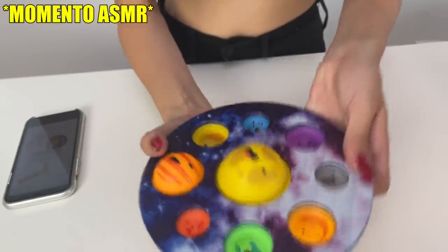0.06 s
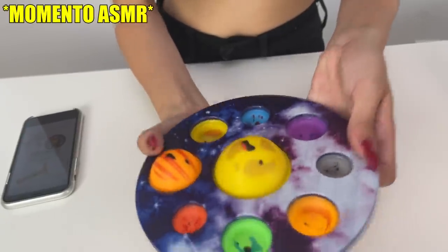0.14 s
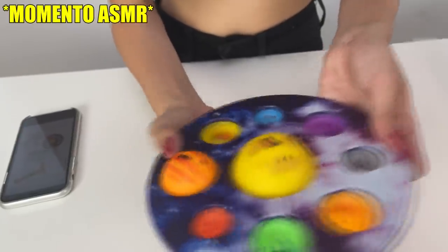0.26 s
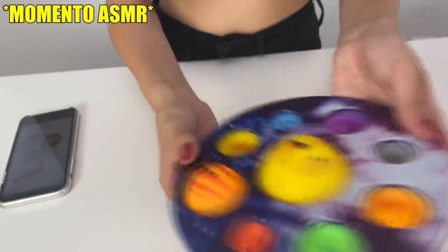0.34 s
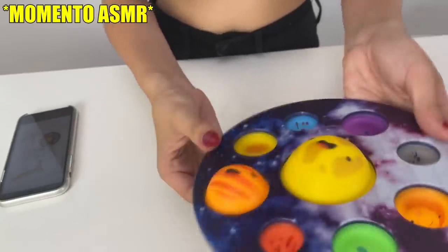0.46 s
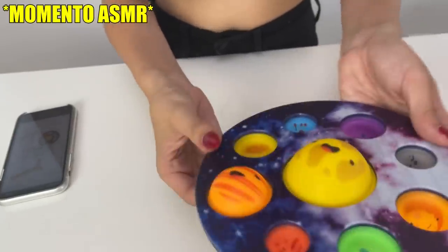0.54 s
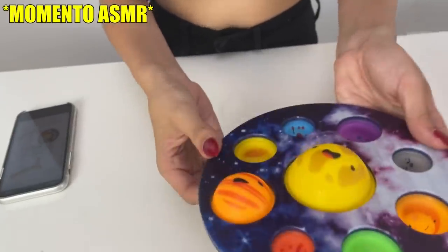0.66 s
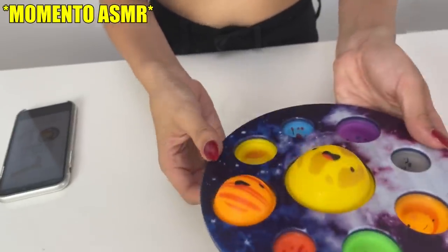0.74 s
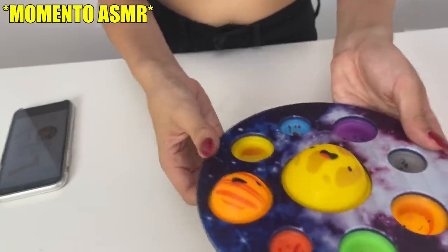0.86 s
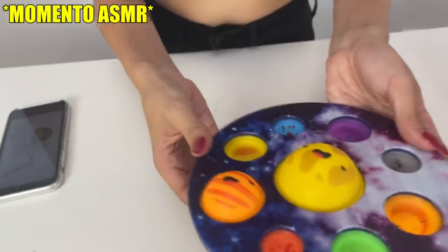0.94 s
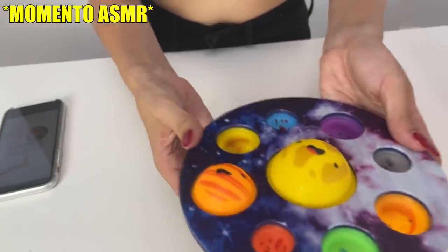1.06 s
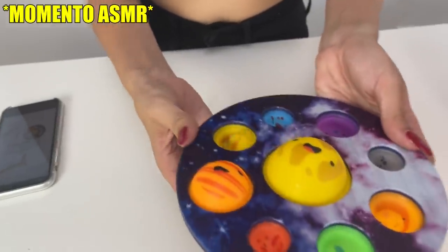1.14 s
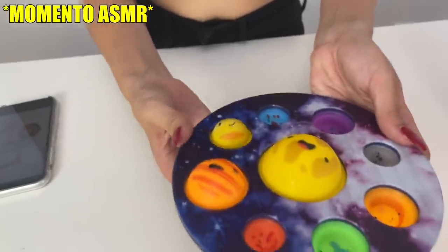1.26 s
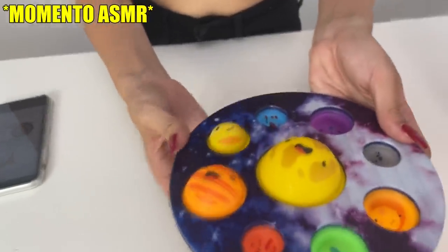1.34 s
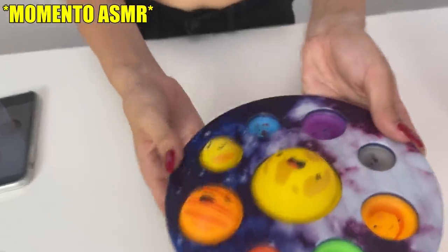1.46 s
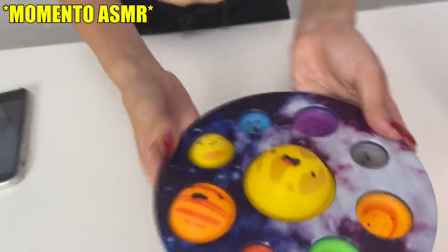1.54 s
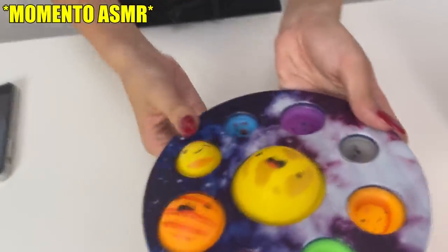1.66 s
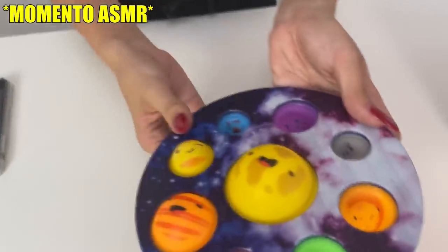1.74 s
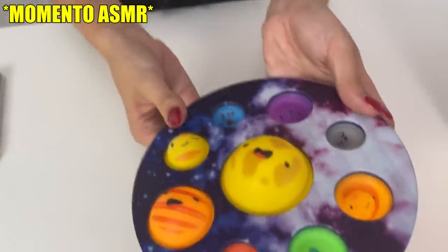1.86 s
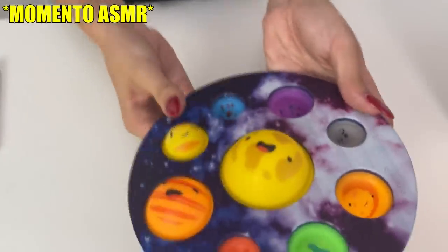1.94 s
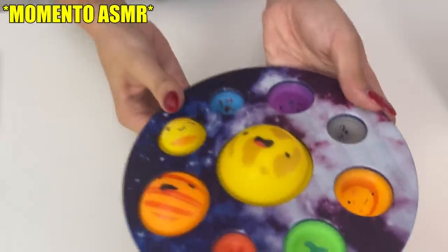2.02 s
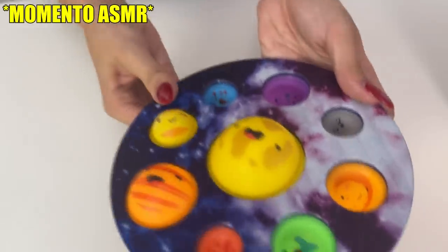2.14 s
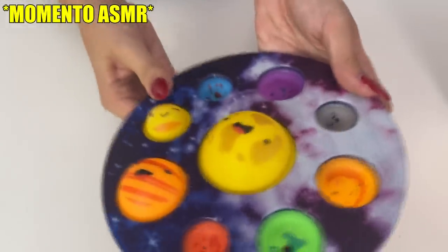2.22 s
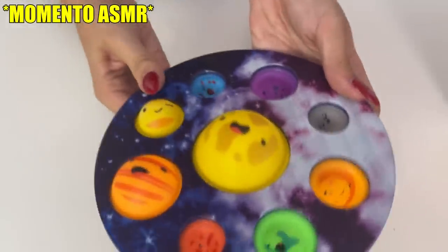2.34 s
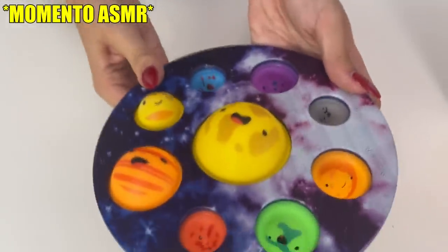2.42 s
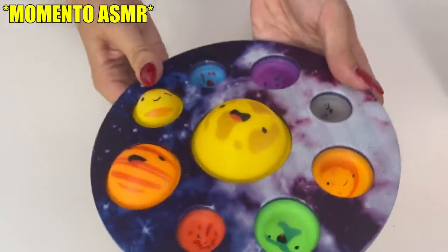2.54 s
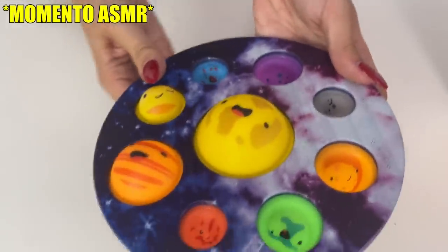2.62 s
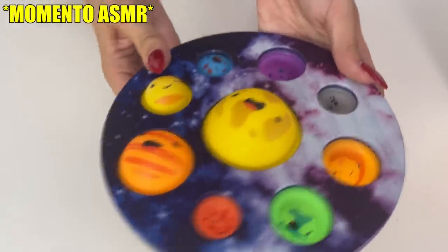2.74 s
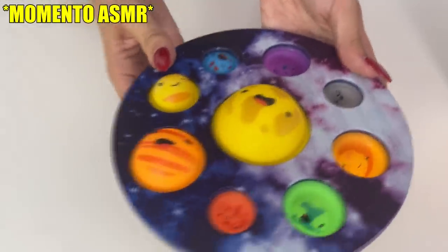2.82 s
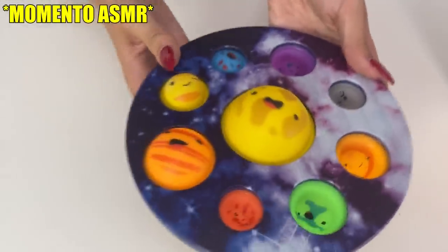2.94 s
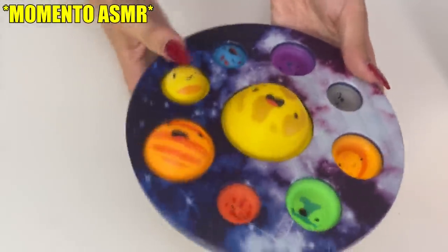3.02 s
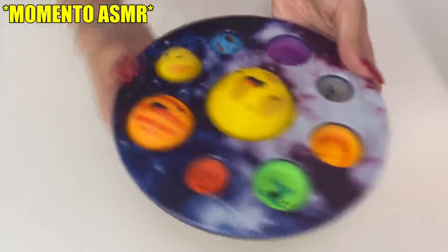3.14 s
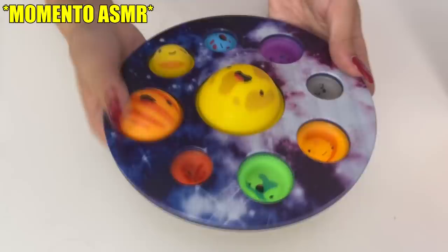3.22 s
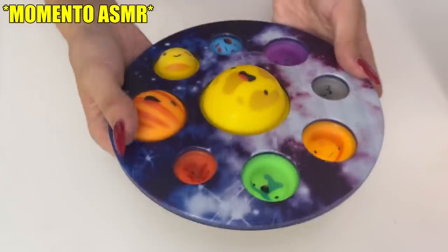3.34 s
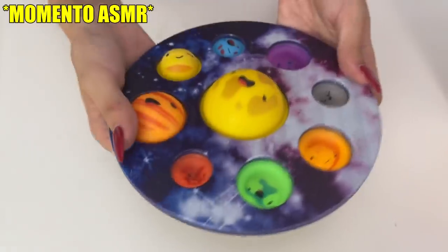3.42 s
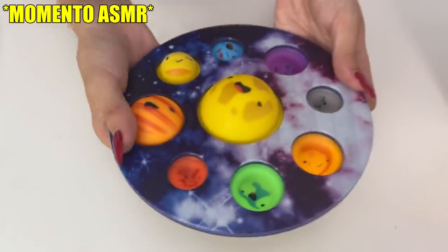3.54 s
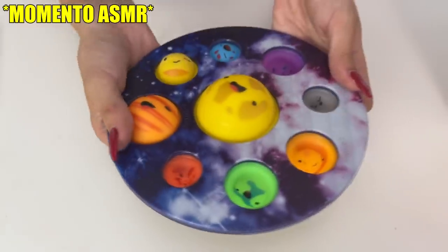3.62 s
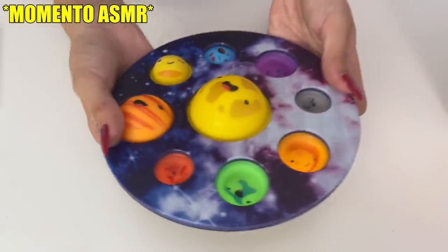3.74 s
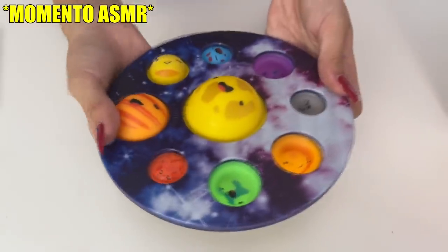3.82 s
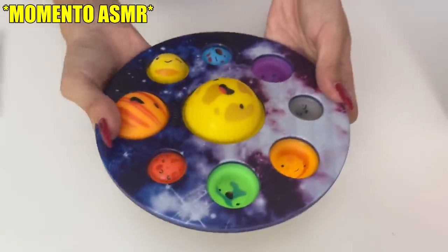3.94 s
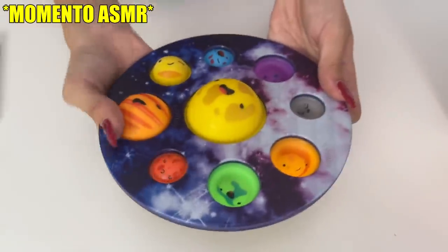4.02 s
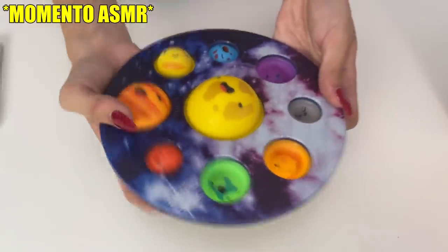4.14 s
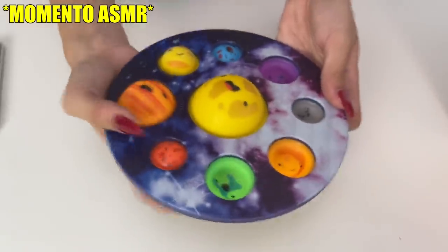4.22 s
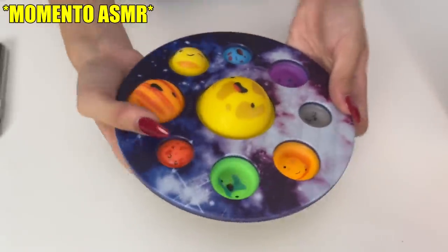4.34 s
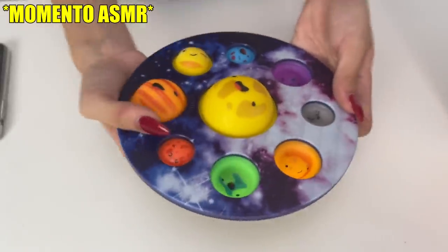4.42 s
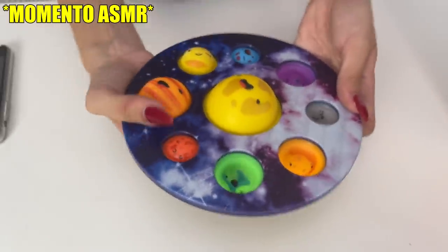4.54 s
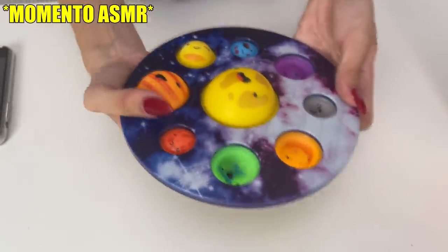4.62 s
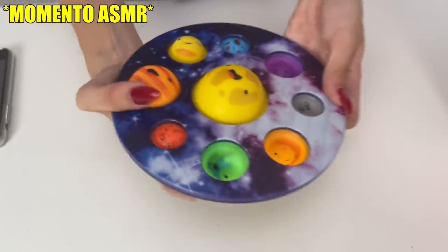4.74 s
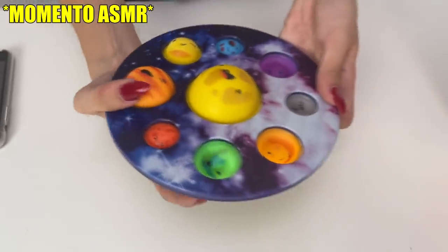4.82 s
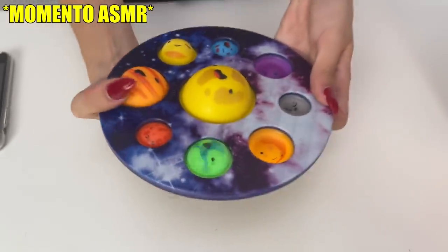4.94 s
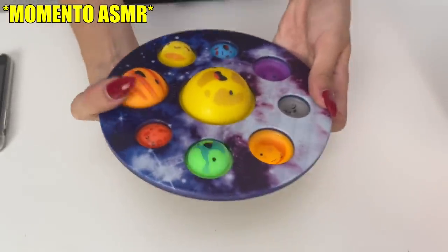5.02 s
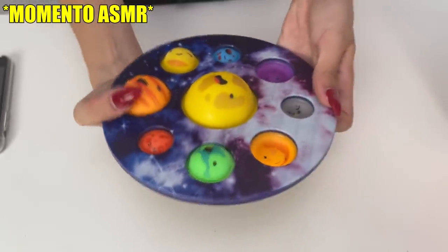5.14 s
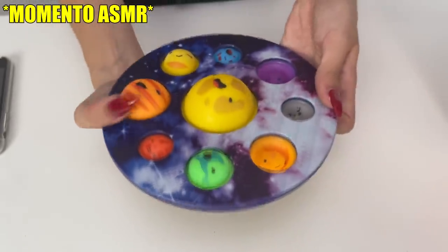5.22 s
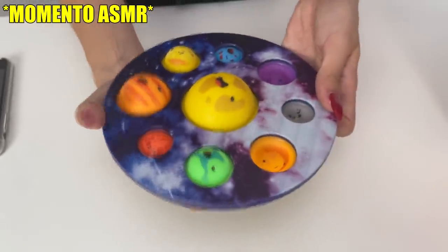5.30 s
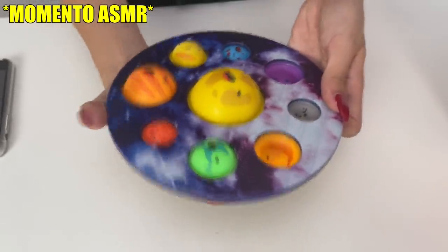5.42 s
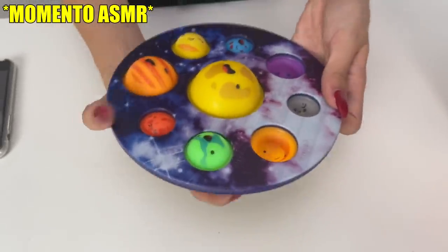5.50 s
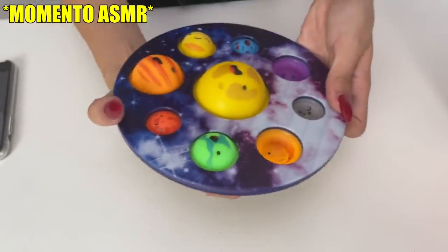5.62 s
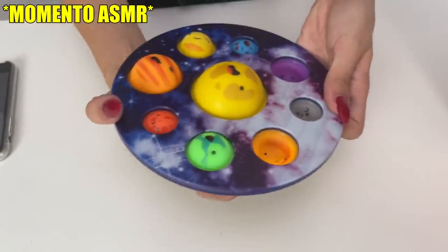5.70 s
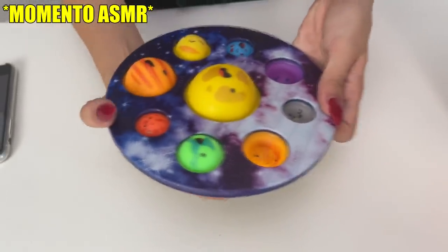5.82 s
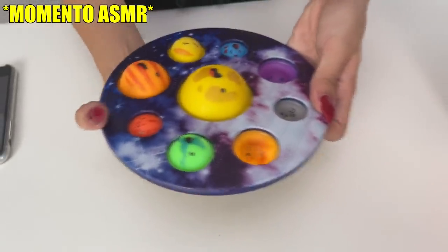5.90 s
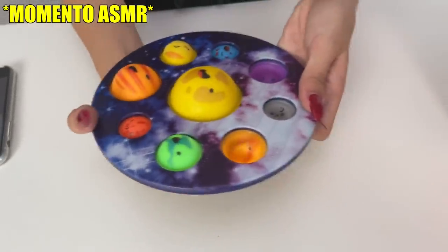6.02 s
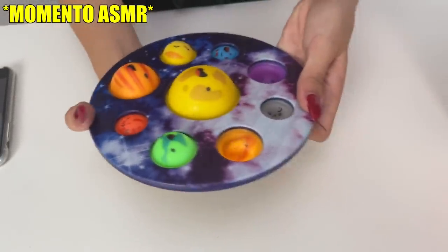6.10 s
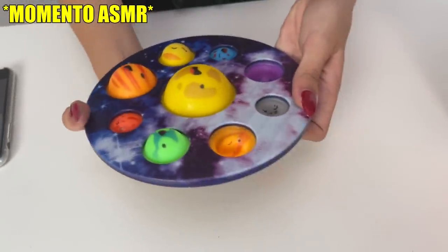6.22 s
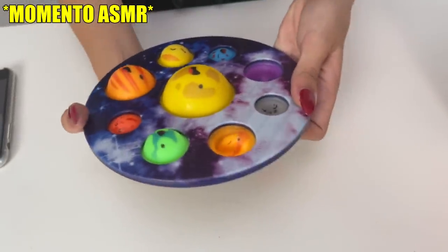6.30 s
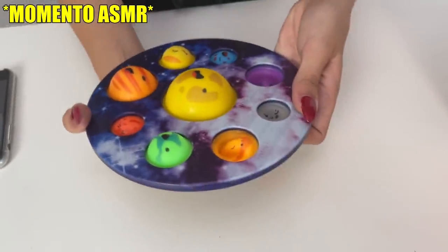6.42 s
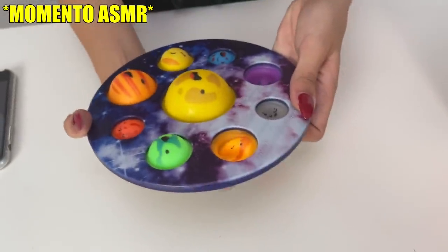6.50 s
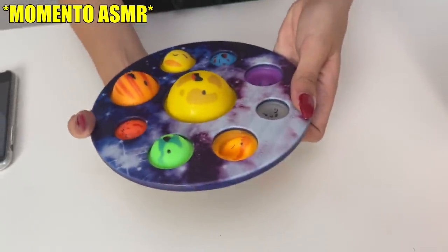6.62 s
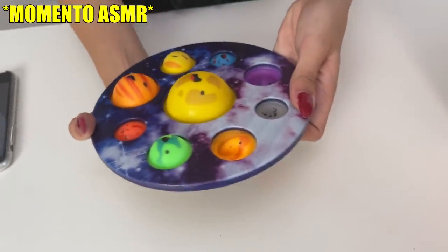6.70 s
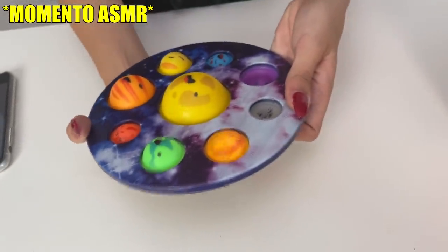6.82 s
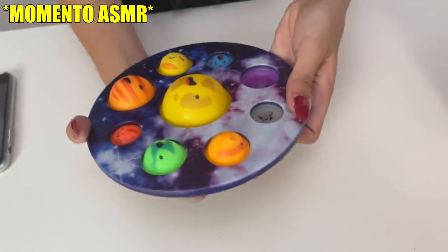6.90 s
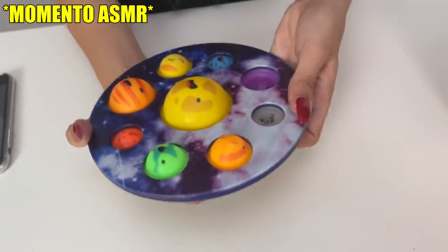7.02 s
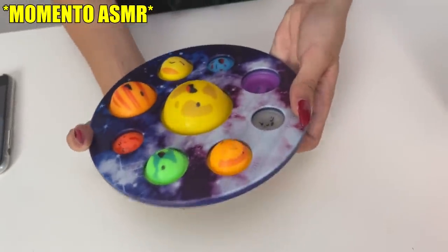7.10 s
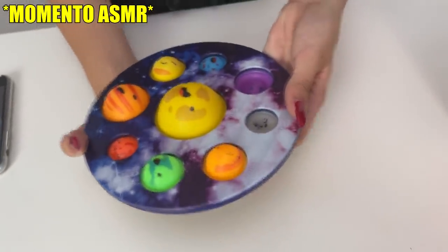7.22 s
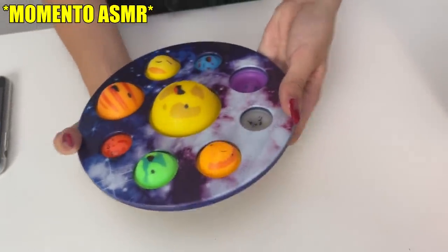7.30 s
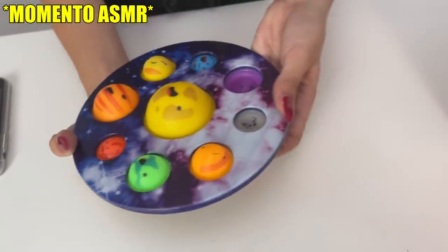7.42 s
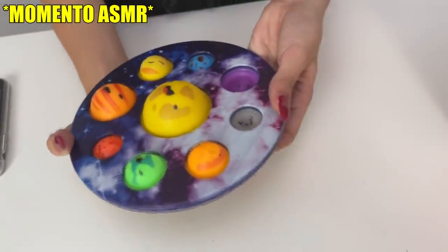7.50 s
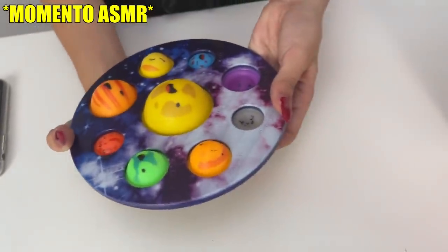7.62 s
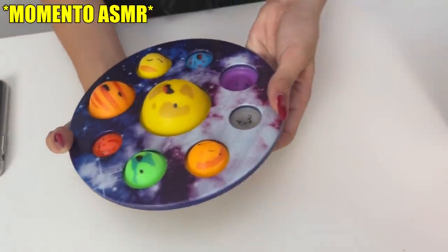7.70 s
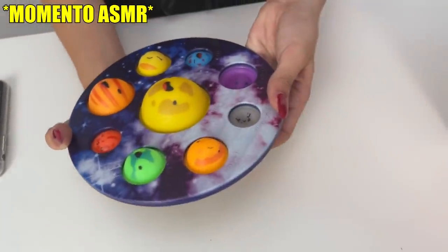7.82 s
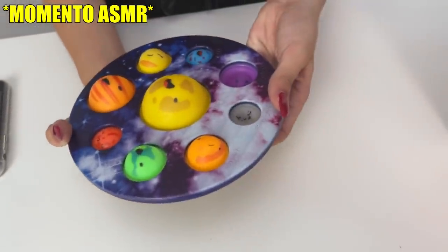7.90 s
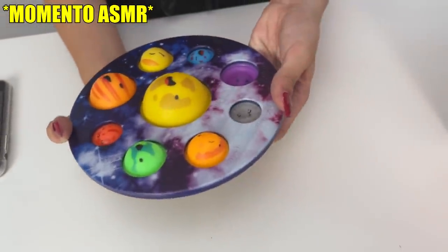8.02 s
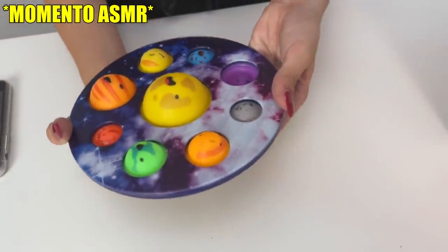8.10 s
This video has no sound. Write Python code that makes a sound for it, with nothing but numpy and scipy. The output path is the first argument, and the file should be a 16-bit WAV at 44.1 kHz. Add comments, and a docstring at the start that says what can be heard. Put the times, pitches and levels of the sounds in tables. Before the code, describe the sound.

Fingers push through a pop toy's rubber bubbles, making sharp, hollow, well-spaced pops with soft nail ticks between them.

```python
"""Popping silicone domes

Fingers push through the domes of a hand-held plastic disc, over a table in a bare, quiet room.
Each dome buckles with a crack, a rattle of the disc and a short hollow resonance. Between pops, nails
tick, skin slides and the hand bumps the disc. The walls reflect these sounds a moment later;
an appliance hums and something is knocked further off."""
import sys
import numpy as np
from scipy import signal
from scipy.fft import rfft, irfft
from scipy.io import wavfile
from scipy.ndimage import uniform_filter1d

SR = 44100
rng = np.random.default_rng(int(sys.argv[2]) if len(sys.argv) > 2 else 0)


def generate_wav(signal):
    """Clip the signal to [-1, 1] and save it as 16-bit WAV at the path in sys.argv[1]."""
    frames = np.transpose(np.atleast_2d(signal))
    scaled = np.clip(frames, -1, 1) * 32767
    pcm = np.round(scaled).astype(np.int16)
    wavfile.write(sys.argv[1], SR, pcm)


N = 359415
FREQ = np.maximum(np.arange(N // 2 + 1) * SR / N, 1)
BLOW_TIME = np.arange(2048) / SR
# Paths of a blow: one straight to the listener, three out to the walls.
DIRECT, WALL_HOLLOW, WALL_DISC, WALL_CRACK = range(4)
ROOM_GAP_S, BLUR_T60_S = .007, .005


def undb(db):
    """Decibels as an amplitude ratio."""
    return 10 ** (np.asarray(db) / 20)


def unit(x):
    """Normalisation to unit RMS."""
    return x / np.sqrt(np.mean(x ** 2))


def spectrum(table):
    """Interpolation of (Hz, value) rows over log frequency."""
    hz, value = np.transpose(table)
    return np.interp(np.log(FREQ), np.log(hz), value)


def band(x, lo_hz, hi_hz):
    """Band-pass filtering."""
    return signal.sosfilt(signal.butter(2, [lo_hz, hi_hz], "bandpass", fs=SR, output="sos"), x)


def ring(t, hz, t60):
    """Free vibration of one damped mode."""
    return np.sin(2 * np.pi * hz * t) * np.exp(-np.log(1000) * t / t60)


def pulse(peak_s):
    """Impact envelope: linear rise, exponential decay."""
    return BLOW_TIME / peak_s * np.exp(1 - BLOW_TIME / peak_s)


def add(out, start, sound):
    """Superposition from a start in seconds."""
    i = int(start * SR)
    out[i:i + len(sound)] += sound[:N - i]


# Each row: frequency in Hz, coherence between left and right from 0 to 1.
COHERENCE = [(60, 0.97), (130, 0.95), (290, 1), (1400, 0), (3100, 0.4), (6800, 0.09), (9000, 0.4)]
def diffuse(gain):
    """A diffuse field is alike at two points in the bass and largely unrelated higher up."""
    alike = spectrum(COHERENCE)
    mid, side = rfft(rng.standard_normal((2, N))) * gain
    channels = mid * np.sqrt(1 + alike) + np.array([[1], [-1]]) * side * np.sqrt(1 - alike)
    return irfft(channels, N) / np.sqrt(2)


# Each row: frequency in Hz, relative spectral density in dB.
ROOM_TONE = [(25, -20), (39, -14.5), (64, -5), (125, -9.5), (231, -22.5), (264, -22.5), (1090, -56.5),
             (3350, -45), (4620, -61.5), (11500, -54), (15000, -76)]
def background(hum_hz=57.2, hum_width_hz=4):
    """Steady room tone and hiss, with an appliance hum that wavers as narrow-band noise does."""
    hum = undb(-65.5) * unit(diffuse(1 / (1 + (2 * (FREQ - hum_hz) / hum_width_hz) ** 2)))
    tone = undb(-66.5) * unit(diffuse(undb(spectrum(ROOM_TONE))))
    hiss = undb(-90.5) * rng.standard_normal((2, N))
    return tone + hum + hiss


def rubber_crack(out, start, db):
    """A brief transient has a broad spectrum: a noise burst nearby, an impulse towards the walls."""
    envelope = pulse(peak_s=.0013)
    grit = band(rng.standard_normal(len(envelope)), 2000, 12000)
    impulse = band((BLOW_TIME == 0) * np.linalg.norm(envelope), 1000, 11000)
    add(out[DIRECT], start - .001, undb(db) * grit * envelope)
    add(out[WALL_CRACK], start - .0005, undb(db + 3.5) * impulse)


# Each row: mode frequency in Hz, relative level in dB, time to decay by 60 dB in seconds.
DISC_MODES = [(1467, -4, 0.054), (1950, -1, 0.0056), (2470, 8, 0.0038), (2980, 3.5, 0.0079),
              (3534, 2.5, 0.014), (4740, -0.5, 0.0049)]
def disc_rattle(out, start, db, spot_hz, grip_detune=.015):
    """Modal excitation: the place of a blow favours modes near one pitch; the grip detunes them."""
    modes = blurred = 0
    for k, (hz, mode_db, t60) in enumerate(DISC_MODES):
        octaves = abs(np.log2(hz / spot_hz))
        gripped_hz = hz * (1 + grip_detune * rng.standard_normal())
        modes += undb(mode_db - 20 * octaves) * ring(BLOW_TIME, gripped_hz, t60)
        # Over all directions, more modes take part and none is sharp.
        blurred += (-1) ** k * undb(-9 * octaves) * ring(BLOW_TIME, hz, BLUR_T60_S)
    jolts = rng.standard_normal(len(BLOW_TIME)) * pulse(peak_s=.0016) ** 2
    rattle = band(signal.fftconvolve(jolts, modes)[:len(jolts)], 1400, 5300)
    rattle *= undb(db) / np.abs(rattle).max()
    blurred *= undb(-1.5) * np.linalg.norm(rattle) / np.linalg.norm(blurred)
    add(out[DIRECT], start - .0005, rattle)
    add(out[WALL_DISC], start - .0005, blurred)


def blow(out, start, db, hollow_hz, disc_db, crack_db, spot_hz):
    """Cavity resonance: just after the crack and the rattle, the hollow rings for a few cycles."""
    rubber_crack(out, start, db + crack_db)
    disc_rattle(out, start, db + disc_db, spot_hz)
    hollow = ring(BLOW_TIME, hollow_hz, t60=.0068) * (1 - np.exp(-BLOW_TIME / .00045)) ** 2
    for path in (DIRECT, WALL_HOLLOW):
        add(out[path], start, undb(db) * hollow / np.abs(hollow).max())


# Each row: start in seconds, level in dB, hollow resonance in Hz, disc and crack levels in dB,
# favoured disc pitch in Hz, low ring in dB. Disc, crack and low ring are relative to the level.
DOME_POPS = [(0.047, -14, 950, 1, -19, 2285, -36), (0.071, -3, 957, -7, -16, 1994, -35.5),
             (1.365, -8.5, 880, -2, -19, 1950, -35.5), (2.798, -28, 1485, 7.5, -11, 2000, -40),
             (2.806, -9.5, 1408, -2, -16.5, 2190, -39.5), (3.94, -16.5, 643, 8, -2, 2000, -34.5),
             (5.059, -9.5, 797, -1.5, -17.5, 2030, -42), (6.951, -8.5, 802, -1, -19.5, 2186, -33)]
def dome_pops(bend_hz=470, low_hz=530, beat_hz=22):
    """Snap-through buckling: a dome bends the whole disc, and two close low modes ring on, beating."""
    out, t = np.zeros((4, N)), np.arange(SR // 2) / SR
    bend = ring(BLOW_TIME, bend_hz, t60=.01) * (1 - np.exp(-BLOW_TIME * bend_hz * 2))
    bend *= undb(-11.5) / np.abs(bend).max()
    low_ring = ring(t, low_hz, t60=.59) + ring(t, low_hz + beat_hz, t60=.59)
    low_ring *= 1 - np.exp(-t / .012)
    for start, db, *timbre, ring_db in DOME_POPS:
        blow(out, start, db, *timbre)
        add(out[DIRECT], start, undb(db + ring_db) * low_ring)
        add(out[DIRECT], start + .002, undb(db) * bend)
        add(out[WALL_HOLLOW], start + .002, undb(db - 7) * bend)
    return out


# Each row: start in seconds, level in dB.
HAND_BUMPS = [(0.05, -26), (0.072, -17), (0.821, -40), (3.75, -52.5), (3.805, -48.5), (3.943, -41),
              (4.838, -34.5)]
def hand_bumps(thud_hz=215):
    """Soft impact: the hand meets the disc with a dull, heavily damped thud."""
    out = np.zeros((4, N))
    thud = np.sin(2 * np.pi * thud_hz * BLOW_TIME) * pulse(peak_s=.0016)
    for start, db in HAND_BUMPS:
        add(out[DIRECT], start, undb(db) * thud)
        add(out[WALL_HOLLOW], start, undb(db - 5) * thud)
    return out


# Each row: band centre in Hz, level in dB, reverberation time in seconds.
ROOM_BANDS = [(154, -44.5, 0.66), (430, -44, 0.82), (940, -42.5, 0.77), (1800, -42.5, 0.71),
              (3530, -43.5, 0.77), (6840, -45, 0.63), (10300, -49, 0.92)]
def reverberation(*sources):
    """Wall reflections arrive after a gap, strong at first, then decay exponentially band by band."""
    t = np.arange(SR) / SR - ROOM_GAP_S
    centres = np.log([row[0] for row in ROOM_BANDS])
    noise, response = rfft(diffuse(0.8)), 0
    onset = np.clip(t * 150, 0, 1) * (1 + 1.7 * np.exp(-t / .019))
    for k, (_, db, t60) in enumerate(ROOM_BANDS):
        share = np.interp(np.log(FREQ), centres, np.arange(len(centres)) == k)
        # Each source radiates its own way, so each has its own echo pattern.
        echoes = irfft(noise * share, N)[:, :len(sources) * SR].reshape(2, len(sources), SR)
        response += undb(db) * onset * np.exp(-np.log(1000) * t / t60) * echoes
    return signal.fftconvolve(np.array(sources)[None], response, axes=2).sum(axis=1)[:, :N]


def swell(length):
    """Envelope of a stroke: a fast rise and a slower fall."""
    return np.sin(np.pi * np.linspace(0, 1, int(length * SR)) ** 0.5) ** 4.7


def wander(samples):
    """Slow random variation: a moving average of noise."""
    return unit(uniform_filter1d(rng.standard_normal(N), size=samples))


def skin_crackle(ticks_per_s=140, hollow_hz=800):
    """Adhesion: skin lets go of the rubber in random ticks, each exciting a hollow or a disc mode."""
    released = rng.random(N) < ticks_per_s / SR
    ticks = released * undb(10 + 4 * rng.exponential(size=N).clip(0, 3))
    pitches = [hollow_hz] + [row[0] for row in DISC_MODES[:-1]]
    excited = rng.integers(len(pitches), size=N)
    t = np.arange(512) / SR
    return sum(np.convolve(ticks * (excited == k), ring(t, hz, BLUR_T60_S))[:N]
               for k, hz in enumerate(pitches))


# Each row: start in seconds, length in seconds, rub level in dB, hiss level in dB.
SKIN_SLIDES = [(0.31, 0.35, -71, -74.5), (0.645, 0.43, -75.5, -93), (1.016, 0.39, -68, -69),
               (1.288, 0.28, -70, -75), (1.596, 0.23, -77, -87), (1.796, 0.37, -80, -70),
               (2.744, 0.065, -68.5, -85), (2.884, 0.32, -57, -84.5), (3.444, 0.12, -88.5, -61.5),
               (3.729, 0.41, -73.5, -75.5), (4.13, 0.24, -59.5, -67.5), (4.609, 0.63, -63, -75.5),
               (5.592, 0.46, -78.5, -71), (5.922, 0.39, -74, -101.5), (6.441, 0.24, -75.5, -75),
               (6.8, 0.32, -79, -71), (7.234, 0.18, -62.5, -78), (2.191, 0.42, -76.5, -85),
               (8.059, 0.24, -75.5, -101.5)]
def skin_slides():
    """Sliding friction: skin catches and slips on plastic and rubber, with a swish and a crackle."""
    rub, hiss = np.zeros((2, N))
    for start, length, rub_db, hiss_db in SKIN_SLIDES:
        add(rub, start, undb(rub_db) * swell(length))
        add(hiss, start, undb(hiss_db) * swell(length))
    rub += undb(-87 + 4 * wander(samples=5000))  # the hands never rest
    grip = undb(3 * wander(samples=300))
    low_noise = unit(band(rng.standard_normal(N), 500, 2300))
    high_noise = unit(band(rng.standard_normal(N), 2400, 11000))
    return rub * (grip * low_noise + skin_crackle()) + hiss * high_noise


# Each row: start in seconds, level in dB, hollow resonance in Hz, disc and crack in dB relative
# to that level, favoured disc pitch in Hz.
FINGER_TAPS = [(0.566, -48.5, 1200, -10, -41, 3000), (0.813, -42.5, 879, -16.5, -45, 1700),
               (1.171, -25, 490, -19, -32.5, 1470), (1.76, -36, 1398, -8, -37, 2900),
               (1.767, -36, 820, 5, -22, 1430), (2.051, -56, 1424, 7.5, -27, 2470),
               (2.249, -48, 1020, -3.5, -16, 1480), (2.342, -30.5, 1480, 0, -6.5, 2300),
               (2.554, -52.5, 874, -19, -40.5, 2080), (3.107, -42.5, 1400, 3.5, -4.5, 2340),
               (3.158, -57, 752, 7.5, -4, 1710), (3.291, -37.5, 773, 1.5, -23.5, 1450),
               (3.361, -25.5, 1330, -2.5, -0.5, 2750), (3.763, -52.5, 773, 5, -12.5, 1450),
               (3.782, -47.5, 790, 2, -5, 1480), (3.8, -40, 873, -7.5, -29.5, 1480),
               (4.257, -44.5, 1100, 1.5, -9.5, 3500), (4.428, -36.5, 940, 0, -15.5, 3860),
               (4.685, -37, 1020, -5.5, -16.5, 1800), (4.692, -40.5, 980, -4, -23, 1610),
               (4.739, -36, 990, -11.5, -15, 2560), (4.747, -41, 1060, 2, -9.5, 1900),
               (4.802, -42.5, 2190, 11, 2, 3700), (4.831, -37.5, 860, -7, -33.5, 1570),
               (4.861, -47.5, 926, 8.5, 8.5, 2960), (4.878, -55.5, 1430, 9.5, -1, 3300),
               (4.966, -50, 710, 2, -10.5, 1570), (5.012, -46, 790, 2.5, -5, 1980),
               (5.388, -29, 1438, -7, 0, 2840), (5.421, -40.5, 1500, 7.5, 3, 3530),
               (5.49, -42, 890, -3, -12, 1530), (5.51, -39, 1030, 4, -38, 3500),
               (6.148, -47.5, 1429, -13, -31, 3800), (6.171, -56, 1430, -1, -27.5, 3410),
               (6.232, -51.5, 1560, 1, -23, 3890), (6.491, -52, 1540, 13, -17, 2440),
               (6.828, -67, 1486, 14.5, -10.5, 2400), (6.855, -55.5, 1640, 13.5, -3, 2350),
               (7.175, -41.5, 630, 11.5, -4, 2770), (7.592, -41.5, 1040, -2, -37, 1624),
               (8.052, -56, 940, -1, -5, 1396)]
def finger_taps():
    """Impact excitation: nails and fingertips lightly sound the resonances of the disc."""
    out = np.zeros((4, N))
    for tap in FINGER_TAPS:
        blow(out, *tap)
    return out


# Each row: start in seconds, length in seconds, pitch in Hz, level in dB.
SKIN_SQUEAKS = [(4.202, 0.041, 3014, -49.5), (6.252, 0.23, 1500, -73.5)]
def skin_squeaks(q=5):
    """Friction of skin on rubber, concentrated in a narrow band."""
    out = np.zeros(N)
    for start, length, hz, db in SKIN_SQUEAKS:
        noise = band(rng.standard_normal(int(length * SR)), hz * (1 - .5 / q), hz * (1 + .5 / q))
        add(out, start, undb(db) * swell(length) * unit(noise))
    return out


# Each row: arrival in seconds, level in dB, pitch in Hz.
FAR_KNOCKS = [(5.72, -21, 424), (5.747, -26, 400), (5.775, -28.5, 385)]
def far_knocks():
    """Damped vibration from dull, distant blows, heard only through the reverberant field."""
    out = np.zeros(N)
    for arrival, db, hz in FAR_KNOCKS:
        add(out, arrival - ROOM_GAP_S, undb(db) * ring(BLOW_TIME, hz, t60=.019))
    return out


# Each row: frequency in Hz, left minus right level of the near sound in dB.
NEAR_BALANCE = [(100, .3), (500, 1.8), (2000, 3.6), (5000, 3.6), (9000, 0)]
def scene(table_lag_s=.0024, table_db=-22.5):
    """Superposition of direct sound, its reflection off the table, reverberation and background."""
    blows = dome_pops() + hand_bumps() + finger_taps()
    # A small disc open on both faces radiates little bass.
    bass_loss = signal.butter(2, 110, "highpass", fs=SR, output="sos")
    direct, hollow, disc, crack = signal.sosfilt(bass_loss, blows)
    skin = skin_slides() + skin_squeaks()
    close = direct + skin
    reflection = undb(table_db) * np.interp(np.arange(N) - table_lag_s * SR, np.arange(N), close)
    balance = undb(np.array([[.5], [-.5]]) * spectrum(NEAR_BALANCE))
    near = irfft(rfft(close + reflection) * balance, N)
    return near + reverberation(hollow + far_knocks(), disc + skin, crack) + background()


# Each row: frequency in Hz, microphone gain in dB.
MIC_RESPONSE = [(6300, 4), (9000, 9.5), (12200, 6.5), (13200, -14.5), (16000, -18)]
# Each row: frequency in Hz, phase lead of the left channel in radians.
PHASE_LEAD = [(700, 0), (1900, .5), (3100, 1.1), (5500, .5), (7600, 1.2), (9000, -1.0), (10300, -3.2),
              (13000, -8.1), (16000, -12.9)]
def record(dry, ceiling=.92, cutoff_hz=16300):
    """Filtering: left and right part in phase in the treble, gain falls above 12 kHz; peaks saturate."""
    phase = np.exp(.5j * np.array([[1], [-1]]) * spectrum(PHASE_LEAD))
    coloured = irfft(rfft(dry) * phase * undb(spectrum(MIC_RESPONSE)), N)
    rounded = ceiling * np.tanh(coloured / ceiling)
    return signal.sosfilt(signal.ellip(8, .2, 70, cutoff_hz, fs=SR, output="sos"), rounded)


dry = scene()
out = record(dry)
generate_wav(out)
```